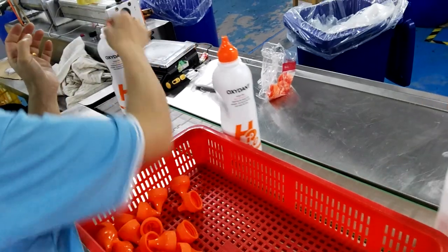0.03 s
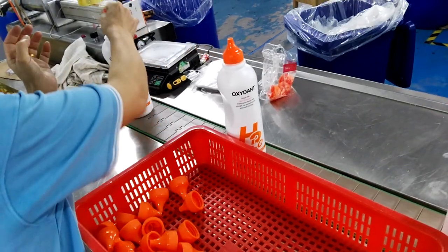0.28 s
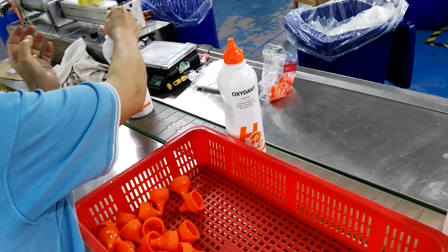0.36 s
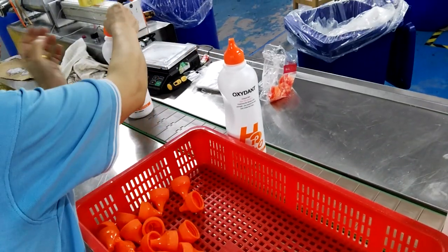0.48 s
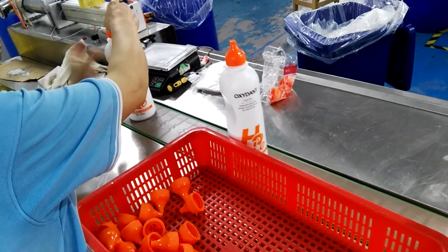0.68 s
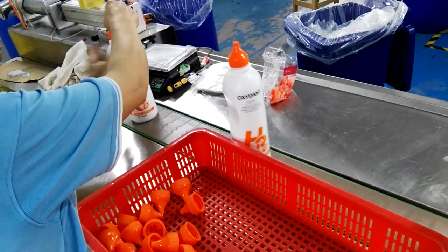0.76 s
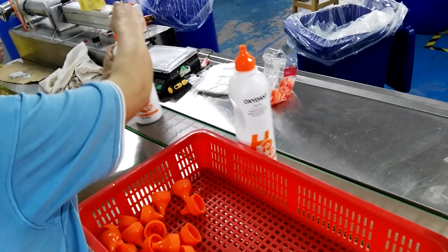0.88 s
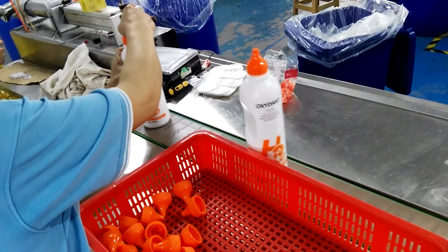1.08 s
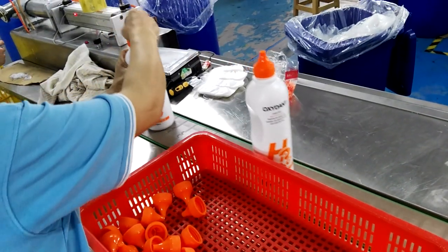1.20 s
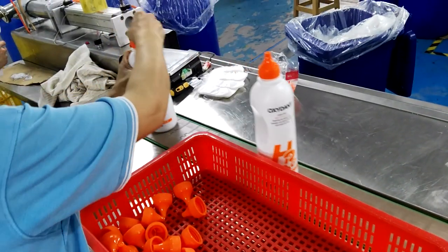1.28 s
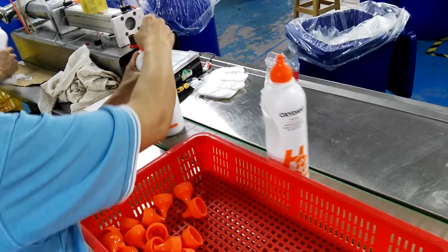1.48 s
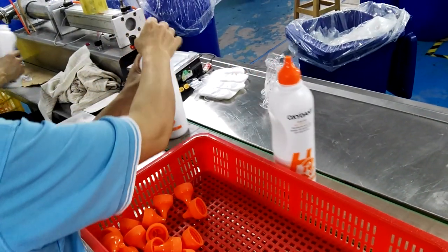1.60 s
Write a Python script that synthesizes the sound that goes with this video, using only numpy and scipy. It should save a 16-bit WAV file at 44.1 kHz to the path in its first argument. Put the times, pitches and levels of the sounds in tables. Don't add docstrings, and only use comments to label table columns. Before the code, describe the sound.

A benchtop capping machine slams down with a metallic clack, then vents air in a long hiss

```python
import sys
import numpy as np
from scipy import signal
from scipy.fft import rfft, irfft, next_fast_len
from scipy.io import wavfile

SR = 44100
rng = np.random.default_rng(int(sys.argv[2]) if len(sys.argv) > 2 else 0)


def dump_mix(stems):
    frames = np.atleast_2d(stems).T
    limited = np.clip(frames, -1, 1)
    pcm = np.round(limited * 32767).astype(np.int16)
    wavfile.write(sys.argv[1], SR, pcm)


def nominal_scale(level):
    x = np.asarray(level, float) / 20
    return 10 ** x


N = 72765

# pitch_hz, likeness [0 to 1]
LIKENESS = [(60, 0.99), (180, 1), (500, 1), (1500, 0.45), (4000, 0.14), (15000, 0.21)]
# pitch_hz, level_db [per Hz]
FRAME_COLOUR = [(400, -8), (1000, -8), (2300, -11), (3500, -21), (8000, -38), (9000, -46), (15500, -48.5)]
AIR_LIKENESS = 0.27


def rms_one(x):
    return x / np.sqrt(np.mean(x ** 2) + 1e-20)


def at_hz(points, hz):
    table = np.array(points)
    return np.interp(np.log(hz), np.log(table[:, 0]), table[:, 1])


def band_pass(low_hz, high_hz):
    return signal.butter(2, [low_hz, high_hz], "band", fs=SR, output="sos")


def high_pass(cut_hz):
    return signal.butter(2, cut_hz, "high", fs=SR, output="sos")


def soft(x, cut_hz):
    r = np.exp(-2 * np.pi * cut_hz / SR)
    return signal.lfilter([(1 - r) ** 2], [1, -2 * r, r * r], x)


def drift(rate):
    r = np.exp(-80 * np.pi * rate / SR)
    wander = signal.lfilter([1], [1, -2 * r, r * r], rng.standard_normal(N // 40 + 2002))
    slow = rms_one(wander[2000:])
    return np.interp(np.arange(N) / 40, np.arange(len(slow)), slow)


def spread_out(mid, side, alike):
    return np.sqrt(1 + alike) * mid + np.sqrt(1 - alike) * side * [[1], [-1]]


def banded(spectrum, patchy_db, alike_share):
    out, together = 0, drift(3.9)
    edges = 30 * 2 ** np.arange(0, 9.3, .4)
    white = rng.standard_normal((2, 2, N))
    lowest_hz = spectrum[0][0]
    for k, (low, high) in enumerate(zip(edges, edges[1:])):
        hz = np.sqrt(low * high)
        if hz < lowest_hz / 2:
            continue
        mid, side = signal.sosfilt(band_pass(low, high), white[k % 2])
        alike = np.clip(at_hz(LIKENESS, hz), 0, 1) ** (1 / alike_share)
        steep = min(1, hz / lowest_hz) ** 2
        flicker_db = patchy_db * (0.5 * together + drift(16.0))
        gain = steep * nominal_scale(at_hz(spectrum, hz) + flicker_db)
        out = out + gain * spread_out(mid, side, alike)
    return rms_one(out)


def bursts(rows, rise_s):
    t, power = np.arange(N) / SR, 0
    for s, hold, db, t60 in rows:
        release_db = 60 * np.maximum(t - s - hold, 0) / t60
        rise = np.clip((t - s) / rise_s, 0, 1)
        power = power + (nominal_scale(db - release_db) * rise) ** 2
    return np.sqrt(power)


def clicks_at(s, gains):
    out = np.zeros(N)
    out[(np.asarray(s) * SR).astype(int)] = gains
    return out


def ring(clicks, hz, t60):
    r, w = 10 ** (-3 / (t60 * SR)), 2 * np.pi * hz / SR
    return signal.lfilter([0, np.sin(w)], [1, -2 * r * np.cos(w), r * r], clicks + 1e-18)


def rings(rows):
    return sum(ring(clicks_at([s], nominal_scale(db)), hz, t60) for s, db, hz, t60 in rows)


def struck(hits, modes, damping, spread_db):
    s, db = np.transpose(hits)
    luck = rng.standard_normal((len(s), len(modes)))
    out = 0
    for k, (hz, level, t60) in enumerate(modes):
        blows = clicks_at(s, nominal_scale(db + level + spread_db * luck[:, k]))
        out = out + ring(blows, hz, damping * min(t60, 1.2))
    return out


def hall():
    # pitch_hz, level_db [per Hz]
    rumble = [(21, -38), (35, -8.5), (323, -7), (359, -5.5), (431, -6.5), (501, -7), (1300, -21.5),
              (1690, -49), (2860, -120)]
    # pitch_hz, level_db [per Hz]
    rumble_top = [(2000, -17), (3000, -30), (4500, -36.5), (9000, -43.5), (11500, -57), (15700, -56)]
    # pitch_hz, width_hz, level_db [re rumble]
    humps = [(99, 19, -12), (162, 56, -11.5), (343.5, 68, -11.5), (496, 79, -30.5), (956, 288, -9.5),
             (2173, 290, -21.5), (9900, 280, -37)]
    # time_s, level_db
    load = [
        (0.0, -33.5),
        (0.794, -30),
        (1.65, -32.5),
    ]
    out = banded(list(rumble[:-2]) + list(rumble_top), patchy_db=2.0, alike_share=0.96)
    for hz, width_hz, db in humps:
        sos = band_pass(hz - width_hz / 2, hz + width_hz / 2)
        noise = signal.sosfilt(sos, rng.standard_normal((2, N + 9000)))
        mid, side = rms_one(noise[:, 9000:])
        alike = np.clip(at_hz(LIKENESS, hz), 0, 1)
        out = out + nominal_scale(db) * spread_out(mid, side, alike)
    s, db = np.transpose(load)
    return nominal_scale(np.interp(np.arange(N) / SR, s, db)) * out


def puff_in():
    # start_s, hold_s, level_db, t60_s
    puff = [(.172, 0.12, -43, 0.86)]
    # pitch_hz, level_db [per Hz]
    puff_colour = [(1500, 10.5), (3000, 2), (6000, -4.5), (9000, -8.5), (15000, -25)]
    return bursts(puff, rise_s=0.02) * banded(puff_colour, patchy_db=0.2, alike_share=AIR_LIKENESS)


def bottle():
    # start_s, level_db, pitch_hz, t60_s
    knocks = [(.180, -25.5, 317, 0.11), (.2435, -11.5, 436, 0.036), (.2555, -13.5, 314.8, 0.13),
              (.2617, -13.5, 328, 0.089), (.297, -27, 480, 0.036), (.288, -22.5, 319, 0.24),
              (.316, -19, 340, 0.051), (.334, -23.5, 380, 0.086), (.375, -22, 440, 0.059),
              (.7225, -9, 329, 0.088), (.7245, -8.5, 495, 0.058), (.772, -10.5, 544, 0.15),
              (.766, -12.5, 321, 0.16), (.803, -16, 350, 0.17), (.935, -24, 334, 0.1),
              (1.215, -26.5, 371.4, 0.16), (1.008, -23, 499, 0.33)]
    # start_s, level_db, pitch_hz, t60_s
    booms = [(.510, -27.5, 168.4, 0.49), (.600, -23, 145.5, .3), (.7350, -20.5, 150.2, 0.49),
             (.7490, -11.5, 157, 0.18), (.8050, -15.5, 175, 0.16), (.8120, -18, 105, 0.1),
             (.8500, -18.5, 172, 0.3), (.895, -20.5, 100, 0.19), (1.295, -19.5, 172, 0.14)]
    both = 1.23 * soft(rings(knocks), cut_hz=780) + 1.17 * soft(rings(booms), cut_hz=290)
    return signal.sosfilt(high_pass(85), both)


def ticks():
    # start_s, level_db [peak], centre_hz, t60_s
    cracks = [(.2660, -37, 12200, 0.012), (0.298, -40, 3470, 0.014), (.4460, -36.5, 4600, 0.0091),
              (.4535, -37, 4000, .008), (.4460, -47, 11000, .006), (.6200, -42, 11500, .01),
              (.6770, -38, 12900, 0.014), (0.724, -35, 6900, .015), (.7240, -37, 13000, 0.019),
              (0.778, -36, 6900, .015), (0.7856, -38, 12300, 0.035)]
    out, size, q = np.zeros(N), 2048, 3.2
    for (s, db, hz, t60), noise in zip(cracks, rng.standard_normal((len(cracks), size))):
        sos = band_pass(hz / (1 + .5 / q), hz * (1 + .5 / q))
        crack = signal.sosfilt(sos, noise * nominal_scale(-60 * np.arange(size) / SR / t60))
        first = int(s * SR)
        out[first:first + size] += nominal_scale(db) * crack / np.abs(crack).max()
    return out


def clatter():
    # start_s, hold_s, level_db, t60_s
    shakes = [
        (.297, 0.013, -30, .25),
        (.350, 0.032, -31, 0.39),
        (.446, 0.01, -32.5, 0.17),
        (.528, 0.029, -35.5, 0.15),
    ]
    return bursts(shakes, rise_s=0.0021) * banded(FRAME_COLOUR, patchy_db=1.5, alike_share=0.99)


def plastic_snaps():
    # start_s, level_db, pitch_hz, t60_s
    snaps = [(.2984, -20.5, 2640, 0.012), (.3780, -25, 2070, 0.018), (.4535, -23, 1540, 0.0074),
             (.7250, -15, 2870, 0.023), (.7310, -17, 1480, 0.029), (1.3101, -16.5, 1680, 0.011),
             (1.3108, -22.5, 1174, 0.013)]
    return soft(rings(snaps), cut_hz=3200)


def bench():
    # start_s, level_db
    blows = [
        (.300, -32),
        (.7235, -20),
        (.7465, -23.5),
        (.777, -21),
        (.800, -37),
    ]
    # pitch_hz, level_db, t60_s
    plate = [(456, 0, 0.38), (548.5, -3, 0.4), (625, -21, 5.0), (850, -9, 0.88), (898, -7.5, 1.1),
             (1033, -1, 0.41), (1340, -35, 0.76)]
    return struck(blows, plate, damping=0.27, spread_db=5.5)


def steel():
    # start_s, level_db
    touches = [(0.3517, -33.5), (0.37, -46), (0.5253, -40), (0.547, -42), (0.725, -35.5), (.7440, -24.5),
               (0.756, -30.5), (.7770, -25), (.7900, -34), (.8050, -26.5), (0.823, -35)]
    # pitch_hz, level_db, t60_s
    part_modes = [(1824, -6.5, 0.55), (2370, -8.5, 0.96), (3260, -25, 0.62), (4057, -14.5, 0.29),
                  (4107, -19, 0.4), (5080, -22, 0.64), (7570, -35, 0.36)]
    # pitch_hz, level_db, t60_s
    collar_modes = [(2230, -2, 0.013), (5120, -12.5, 0.037), (6070, -19, 0.035), (6920, -17, 0.08),
                    (7800, -19.5, 0.061), (8900, -36, .04), (12600, -28, .03)]
    # pitch_hz, level_db, t60_s
    collar_ring_modes = [(3364, -11, 0.057), (4072, 2, 0.042)]
    chatter_t60_s, chatter_db, pan_db = .035, -18, -5
    s, db = np.transpose(touches)
    fade = nominal_scale(-60 / (chatter_t60_s * SR))
    envelope = signal.lfilter([1], [1, -fade], clicks_at(s, nominal_scale(db + chatter_db)))
    chatter = envelope * rng.standard_normal((2, N))
    collar = sum(nominal_scale(level) * ring(chatter, hz, t60) for hz, level, t60 in collar_modes)
    parts = np.array([struck(touches, part_modes, damping=0.56, spread_db=3.5) for side in "LR"])
    collar_ring = struck(touches, collar_ring_modes, damping=0.88, spread_db=2.0)
    return (collar + parts + collar_ring) * nominal_scale([[pan_db / 2], [-pan_db / 2]])


def long_rods():
    # start_s, level_db, pitch_hz, t60_s
    rods = [(.745, -36, 3253, 1.4), (.862, -46, 4046, .35), (.930, -49, 4054, .4), (.744, -42, 5104, .7),
            (.762, -42, 5050, .3), (.823, -44, 5060, .2), (.777, -42, 7547, .35), (.820, -45, 6998, .2),
            (.790, -46, 6573, .2), (.777, -44, 6094, .15), (.734, -42, 7100, .05), (.750, -44, 7800, .06),
            (.786, -39, 11100, .04), (.787, -41, 12700, .04), (.790, -48, 9173, .12),
            (.810, -50, 11500, .15), (.454, -47, 11300, .012)]
    return rings(rods)


def whistles():
    # start_s, hold_s, level_db, t60_s, pitch_hz, width_hz
    ports = [
        (.605, .04, -54, .6, 8900, 900),
        (1.26, 0.053, -51, .8, 6050, 380),
        (1.4, 0.22, -49, 2.3, 2210, 190),
    ]
    out = 0
    for (s, hold, db, t60, hz, width_hz), noise in zip(ports, rng.standard_normal((len(ports), 2, N))):
        sos = band_pass(hz - width_hz / 2, hz + width_hz / 2)
        out = out + bursts([(s, hold, db, t60)], rise_s=.008) * rms_one(signal.sosfilt(sos, noise))
    return out


def puff_down():
    # start_s, hold_s, level_db, t60_s
    puff = [(.608, 0.16, -46, 0.32)]
    # pitch_hz, level_db [per Hz]
    puff_colour = [(2500, 6), (6500, -3.5), (9000, -10), (11000, -11), (15000, -18)]
    return bursts(puff, rise_s=.006) * banded(puff_colour, patchy_db=-1.5, alike_share=AIR_LIKENESS)


def slam():
    # start_s, hold_s, level_db, t60_s
    crash = [(.723, 0.059, -21.5, 0.49)]
    return bursts(crash, rise_s=0.0031) * banded(FRAME_COLOUR, patchy_db=2.0, alike_share=0.81)


def vent():
    # start_s, hold_s, level_db, t60_s
    hiss = [(1.226, 0.11, -37, 3.7)]
    # pitch_hz, level_db [per Hz]
    hiss_colour = [(710, -35), (1200, -31), (1390, -31), (1460, -4), (2180, 0.5), (3000, -2.5), (4410, -2),
                   (6500, -9.5), (12000, -25.5), (15600, -52), (22000, -120)]
    # start_s, hold_s, level_db, t60_s
    jet = [(1.225, 0.072, -46, 1.1)]
    # pitch_hz, level_db [per Hz]
    jet_colour = [(5000, 0.5), (8000, -2), (11000, -10.5), (13000, 5), (15500, -10)]
    body = bursts(hiss, rise_s=0.036) * banded(hiss_colour, patchy_db=0.6, alike_share=AIR_LIKENESS)
    treble = bursts(jet, rise_s=0.0094) * banded(jet_colour, patchy_db=0.0, alike_share=AIR_LIKENESS)
    return body + treble


def room(x):
    t60_s, wall_cut_hz = 0.78, 6400
    t = np.arange(SR) / SR
    noise = rng.standard_normal((3, SR))
    echoes = signal.sosfilt(high_pass(450), noise[:2]) + soft(noise[2], cut_hz=600)
    dull = soft(echoes, wall_cut_hz) * nominal_scale(-60 * t / t60_s)
    bright = 0.52 * echoes * nominal_scale(-60 * t / (1.06 * t60_s))
    tail = (dull + bright) * np.clip(t / 0.0075, 0, 1)
    tail = tail / np.sqrt(np.sum(tail ** 2) / 2)
    return signal.fftconvolve(x[None], tail, axes=1)[:, :N]


def between_ports(x, tilt, lag_s):
    # pitch_hz, level_db [left minus right]
    port_tilt = [(60, 0), (640, -1), (1400, 2), (3500, 0.5), (6500, 0.5), (10000, 8.5), (15000, 12.5)]
    size = next_fast_len(N + 2048)
    hz = np.arange(size // 2 + 1) * SR / size + 1e-3
    half = nominal_scale(tilt * at_hz(port_tilt, hz) / 2) * np.exp(1j * np.pi * hz * lag_s)
    return irfft(rfft(x * np.ones((2, 1)), size) * [half, 1 / half], size)[:, :N]


def scene():
    hits = bottle() + bench() + steel()
    ahead = plastic_snaps() + ticks() + long_rods()
    air = puff_in() + puff_down() + vent() + whistles()
    echoes = nominal_scale(-13.5) * room(hits[0] + ahead)
    left = hall() + hits + echoes + clatter() + slam()
    return between_ports(left, tilt=0, lag_s=0.00031) + ahead + air


def band_limit(x):
    return signal.sosfilt(signal.butter(12, 15700, fs=SR, output="sos"), x)


def record(dry):
    low_cut = signal.butter(4, 43, "high", fs=SR, output="sos")
    top_cut = signal.ellip(12, 1, 70, 15700, fs=SR, output="sos")
    heard = between_ports(dry, tilt=1, lag_s=0)
    mix = signal.sosfilt(np.vstack([low_cut, top_cut]), heard)
    return band_limit(mix)


dry = scene()
out = record(dry)
dump_mix(out)
```